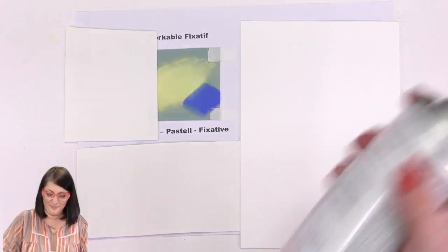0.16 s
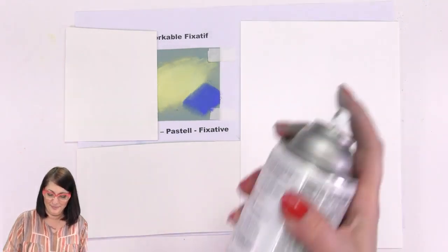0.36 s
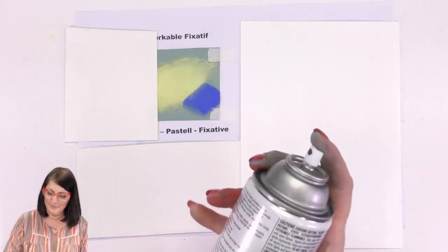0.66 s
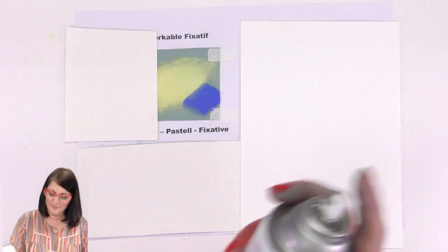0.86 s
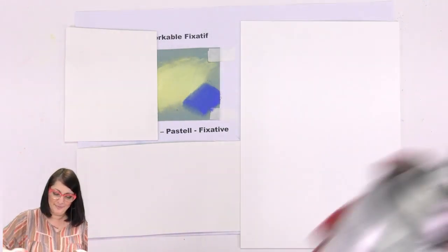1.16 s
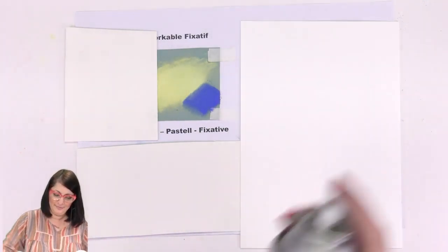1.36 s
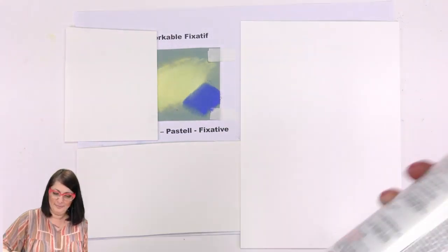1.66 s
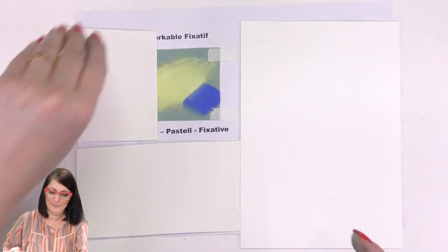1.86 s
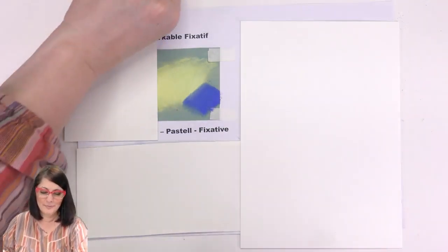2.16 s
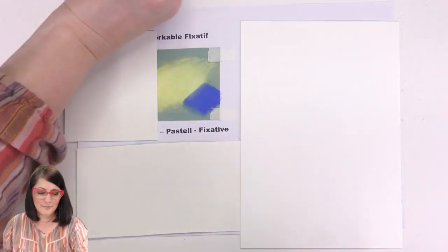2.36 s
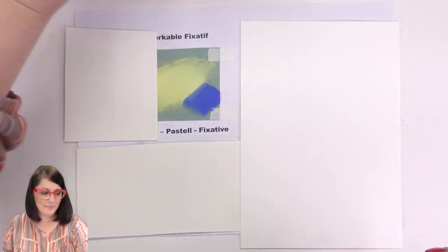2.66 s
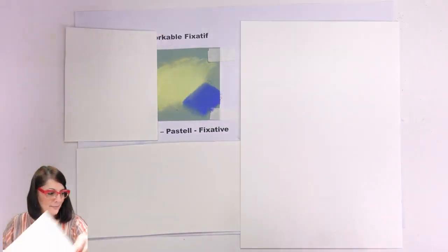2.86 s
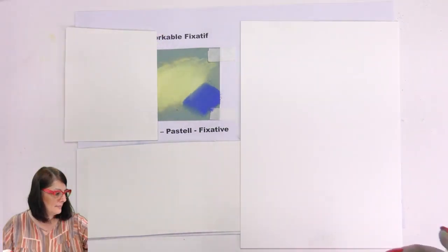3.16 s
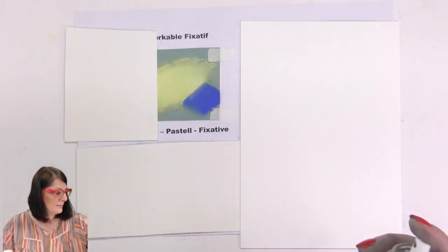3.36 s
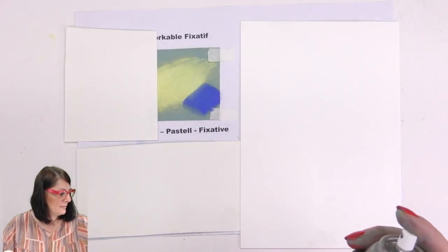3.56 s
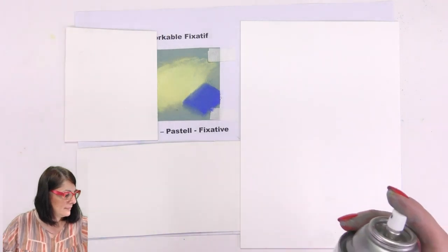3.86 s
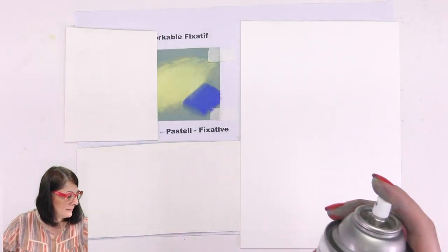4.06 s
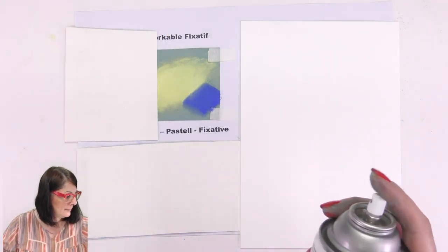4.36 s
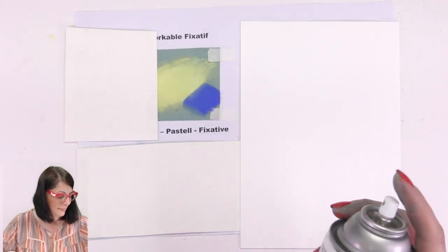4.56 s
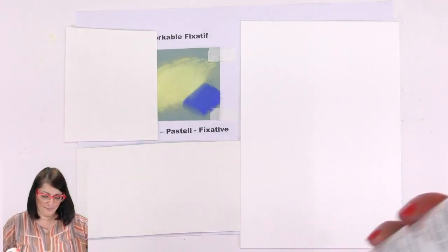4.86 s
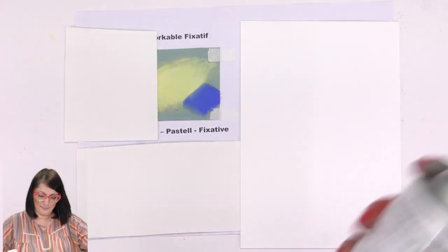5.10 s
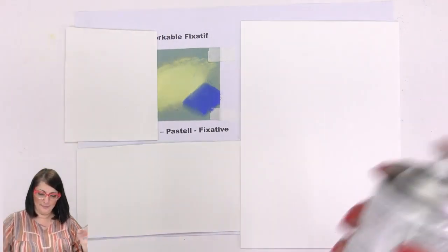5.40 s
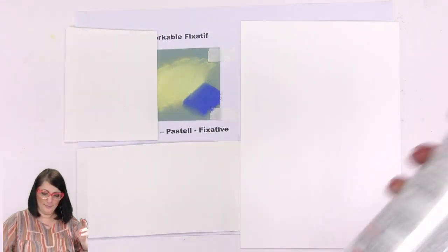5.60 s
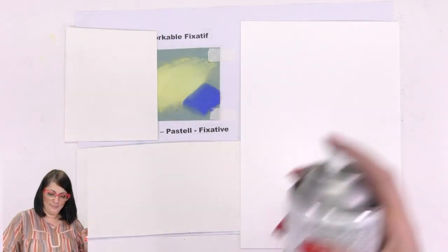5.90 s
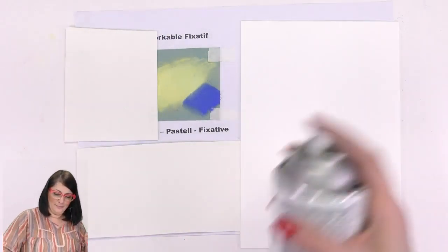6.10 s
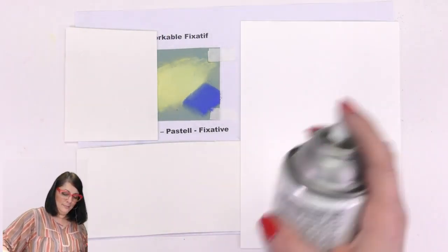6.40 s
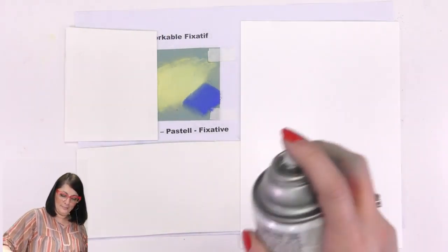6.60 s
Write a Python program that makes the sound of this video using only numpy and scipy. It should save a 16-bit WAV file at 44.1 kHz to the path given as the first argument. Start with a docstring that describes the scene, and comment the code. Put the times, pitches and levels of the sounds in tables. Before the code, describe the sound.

Leftover fizz and light ball knocks die away in an aerosol can, then a brief burst of loud steel clacks with liquid fizz. The ball bounces and rolls to a stop. A quiet pause holds only dry paper rubs, small desk bumps and faint swilling. Rapid rattling returns for over a second. Close microphone, slightly overloaded, leaning right, short indoor room tail.

```python
"""Fizz from an earlier stroke dies away while a few light knocks and a settling ball patter and roll along a can wall.
A burst of shaking follows: the mixing ball clacks on the can ends, glances off the wall, and the liquid fizzes.
The ball settles again, then a hand rubs and bumps about on paper and a desk while the liquid swills faintly.
A second, longer burst ends in a few knocks. Hits are decaying sines with noise; fizz, rubs and air are shaped noise.
A small room's low noise lies under it all, and the close microphone overloads on the hardest hits."""
import sys
import numpy as np
from scipy import signal
from scipy.fft import rfft, irfft
from scipy.io import wavfile
from scipy.ndimage import uniform_filter1d

SR = 44100
rng = np.random.default_rng(int(sys.argv[2]) if len(sys.argv) > 2 else 0)


def digitize_waveform(pressure):
    """Quantize a signal to 16-bit integers and store it at the path in sys.argv[1].

    Rows of a 2-D input are taken as channels; values are limited to [-1, 1].
    """
    field = np.atleast_2d(pressure).T
    bounded = np.clip(field, -1, 1)
    quanta = np.round(bounded * 32767).astype(np.int16)
    wavfile.write(sys.argv[1], SR, quanta)


N = 297234  # length in samples
AGE = np.arange(4096) / SR  # seconds since a hit

# Steady room noise, spectrum: freq_hz, relative_level_db
ROOM_NOISE = [(12, -27.5), (20, -1), (53, -0.5), (150, -11), (270, -1), (328, -10), (527, -19), (949, -22),
              (1030, -21.5), (1290, -23), (6360, -36), (16000, -42)]
ROOM_NOISE_DB = -59
# Decay of the room's tail: freq_hz, t60_s
ROOM_T60 = [(200, 0.1), (800, 0.31), (1600, 0.27), (4000, 0.26), (9000, 0.24), (16000, 0.15)]
# Tone of the room's tail: freq_hz, relative_level_db
ROOM_COLOUR = [(100, -15.5), (500, 4.5), (1500, 2.5), (3500, 0.5), (8000, 4), (16000, 5)]
# Echoes from the desk: delay_s, relative_level_db
DESK_ECHOES = [(.0023, -3), (.0056, -7.5), (.0101, -4), (.0135, -18)]

# Air pushed at the microphone by the moving can: fastest_s, length_s, level_db
DRAUGHTS = [(.12, 0.28, -45.5), (1.15, 1.73, -47.5), (5.5, 2.56, -53)]
# Spectrum of that air: freq_hz, relative_level_db
DRAUGHT_COLOUR = [(4, -11.5), (12, -1.5), (25, -12.0), (50, -29), (200, -55.0), (1000, -100)]
SPEED_UP = .35  # share of any movement spent gathering speed

# Hand and sleeve sliding on paper or can: fastest_s, length_s, rub_db, hiss_db
RUBS = [(0.757, 0.22, -66.5, -67), (2.125, 0.26, -62, -58), (2.217, 0.13, -58.5, -63),
        (2.433, 0.65, -58.5, -51.5), (2.774, 0.22, -67, -68), (3.07, 0.19, -75.5, -68.5),
        (3.796, .14, -59.5, -67.5), (4.212, 0.062, -59, -57.5), (4.29, 0.21, -61.5, -64),
        (4.474, 0.3, -61.5, -59), (4.83, .13, -72, -65.5)]
# Dull part of the rubbing, spectrum: freq_hz, relative_level_db
RUB_COLOUR = [(200, -7), (500, -2.5), (900, -2), (1500, -0.5), (2300, -3.5), (4000, -18), (8000, -20),
              (16000, -42)]
# Fine part of the rubbing, spectrum: freq_hz, relative_level_db
HISS_COLOUR = [(1000, -24), (3000, 2.5), (6000, -0.5), (10000, -5), (13000, -8.5), (16000, -13)]
# Soft bumps of the hand on the desk: start_s, level_db
BUMPS = [(2.787, -54), (3.125, -51.5), (4.3, -53.5), (4.629, -44.5)]
# Spectrum of a bump: freq_hz, relative_level_db
BUMP_COLOUR = [(100, -20), (600, 9.5), (1200, 6.0), (2500, -3.0), (8000, -21)]

# Liquid fizz, also the can's noisy shimmer, spectrum: freq_hz, relative_level_db
FIZZ_COLOUR = [(100, -31), (400, -23), (900, -10), (1400, -5.5), (2200, -3), (3000, -0.5), (3700, -4.5),
               (4600, -7.5), (6500, -3.5), (9500, -10.5), (15500, -18.5)]
# Fizz left over from an earlier stroke: start_s, level_db
FIRST_SLOSH = (0, -29)
# Liquid rocking in the tilted can, each swill fainter and higher than the one before
SWILL_START_S, SWILL_PERIOD_S, SWILL_LENGTH_S = 2.725, .297, .15  # start is the middle of the first swill
SWILL_DB, SWILL_FADE_DB, SWILL_HZ, SWILL_RISE_HZ = -61.5, -2.2, 3670, 150

# The ball settles by bouncing and rolling: start_s, length_s, bounce_db, ring_hz, patter_pace, roll_db
SETTLES = [(0.2359, 0.53, -27.5, 1970, 1.03, -60.5), (1.4446, 0.24, -20.5, 1640, 1.2, -53),
           (1.8598, 0.19, -21, 1560, .95, -57), (2.333, 0.25, -28.5, 1513, 1.7, -51.5)]
# Bounces quicken to a steady patter; the last gap is for a pace of 1
FIRST_GAP_S, LAST_GAP_S, GAP_SHRINK = .0467, .0205, .32
# The ring drifts towards the wall's pitch, keeping this share of the distance at each bounce
WALL_HZ, PITCH_KEPT = 1532, 0.6
BOUNCE_FADE_DB, BOUNCE_TICK_DB = -37, -5  # fade over one settle's length; tick against ring

# Single lighter knocks of the ball, most on the side wall, the higher-ringing ones on a can end:
# start_s, strength_db, ring_hz, tick_db (against ring)
KNOCKS = [(0.0968, -29, 1080, -3), (0.236, -21, 1870, -15), (0.3738, -31, 3800, -7.5),
          (0.4185, -30.5, 2210, -8), (0.4381, -30, 3820, -10), (0.453, -35, 3620, -8),
          (0.9217, -31, 1810, -5), (0.9801, -29, 2250, -15), (1.2186, -23, 3240, 2.5),
          (1.241, -18.5, 1950, -2), (1.2988, -21, 2020, -7), (1.4473, -15.5, 1860, -10),
          (1.477, -22, 1860, -20), (1.7303, -21.5, 1830, -5), (1.8598, -28, 1580, -6),
          (2.3944, -28.5, 3650, -11), (2.462, -31, 3570, -8), (2.492, -34, 3580, -9),
          (2.5196, -35, 3500, -2.5), (4.917, -31.5, 1890, -1.5), (4.9406, -38.5, 4370, 2.5),
          (4.969, -34, 1650, -2), (5.303, -27, 3180, 5), (5.4247, -14.5, 1720, -17),
          (5.513, -22, 1180, -0.5), (5.5758, -22, 2320, 12), (5.8433, -19.5, 1860, -13),
          (5.97, -21.5, 1150, -4), (6.2106, -18, 3700, -24), (6.254, -17.5, 2040, -23),
          (6.4215, -15.5, 1860, -1.5), (6.509, -21.5, 1566, -1.5), (6.6382, -23, 2050, -3.5),
          (6.725, -30.5, 1740, 3)]
# A full stroke throws the ball back at the wall, and a second knock follows
REBOUND_S, REBOUND_DB, REBOUND_HZ, REBOUND_TICK_DB = .0555, -17.5, 1870, -17
SECOND_KNOCK_S, SECOND_KNOCK_DB = 0.036, -5  # average lag after the first; level offset
REBOUND_SCATTER_OCT = 0.49  # standard deviation of the pitch
KNOCK_RING_DB, KNOCK_RING_T60_S = -22, 0.18  # the can sings on faintly after a knock

# Ball on a can end: start_s, strength_db, ring_hz, tick_db (against ring), landing_spot,
# slosh_db (None unless the stroke throws the liquid)
CLACKS = [(0.9916, -2, 4624, -14, "rim", None), (1.019, -9.5, 3700, -2.5, "rim", None),
          (1.075, -4, 3660, -4, "dome", -27.5), (1.154, -.5, 3150, -6.5, "rim", None),
          (1.1638, 3, 3660, -42, "dome", -26), (1.3021, -3.5, 3720, -2, "dome", -29),
          (1.396, 3.5, 3466, -9, "rim", -19.5), (1.8256, -11, 3900, -15, "dome", None),
          (2.33, -20, 3790, -7, "dome", None), (4.993, -11.5, 4340, 2, "dome", None),
          (5.1055, -0.5, 3134, -7.5, "rim", -24.5), (5.2041, -5, 3920, -1.5, "dome", -32),
          (5.3065, 2.5, 3523, -11.5, "rim", -25), (5.435, -6.5, 3630, 0, "dome", None),
          (5.551, 0.5, 3570, -11, "rim", None), (5.555, 0, 3460, -17, "rim", -26.5),
          (5.6574, -3.5, 3710, -0.5, "dome", None), (5.742, 2.5, 3580, -3.5, "dome", -25.5),
          (5.8729, -3.5, 3740, -5.5, "dome", -29), (5.9738, 2, 3650, -11.5, "dome", -31),
          (6.091, -7, 3800, 4.5, "dome", -31.5), (6.1828, 3, 3764, -10, "dome", -22.5),
          (6.3081, -11, 3780, 2.5, "dome", None), (6.6992, -22.5, 3860, 8.5, "rim", None)]
# Low thud by landing spot, strong on the springy dome, faint on the stiff rim: level_db (against hit)
THUD_DB = {"dome": -22.5, "rim": -41}
# Nominal modes of the thin steel shell: pitch_hz, relative_level_db, t60_s
SHELL = [(995, -7.5, 0.0031), (1154, -0.5, 0.011), (1530, -1, 0.013), (1837, -10, 0.022), (2260, -6, 0.016),
         (2630, 0.5, 0.008), (3150, -4, 0.02), (3385, -3, .013), (3805, -6, 0.037), (4167, 1.5, 0.015),
         (4626, 5, 0.0087), (5010, -2.5, 0.0043), (5340, 0, 0.017), (6124, -1, 0.011)]
# Steel-on-steel tick, spectrum: freq_hz, relative_level_db
TICK_COLOUR = [(600, -9.5), (2000, 2.5), (3000, -0.5), (5200, 5), (7000, -8.5), (8000, -0.5), (10000, 1.5),
               (12500, -8), (15500, -1.5)]

BALANCE_DB = -7.5  # left against right
EDGE_HZ = 16000  # top of the microphone's band


def amp(db):
    """Decibels to gain."""
    return 10 ** (np.asarray(db) / 20)


def unit(x):
    """Scales to an rms of 1."""
    return x / np.sqrt(np.mean(x ** 2) + 1e-20)


def blow(x):
    """Scales a hit to the energy of 2 ms at rms 1."""
    return x / np.sqrt(np.sum(x ** 2) / (.002 * SR) + 1e-20)


def fade(t, t60_s):
    """Exponential decay that falls 60 dB in t60_s."""
    return amp(-60 * t / t60_s)


def sine(hz, t):
    """Steady sine tone."""
    return np.sin(2 * np.pi * hz * t)


def read(points, hz):
    """Reads a spectrum on a log-frequency axis."""
    f, value = np.transpose(points)
    return np.interp(np.log(hz + 1), np.log(f + 1), value)


def vary(colour):
    """The same spectrum with random bumps and dips: no two blows land on the same spot."""
    hz = np.geomspace(100, 16000, 30)
    return np.column_stack([hz, read(colour, hz) + 2.5 * rng.standard_normal(len(hz))])


def add(mix, s, sound):
    """Mixes a sound in at time s."""
    part = mix[max(round(s * SR), 0):][:len(sound)]
    part += sound[:len(part)]


def tint(x, colour):
    """Filters a sound by the given spectrum and scales it to rms 1."""
    hz = np.fft.rfftfreq(len(x), 1 / SR)
    return unit(irfft(rfft(x) * amp(read(colour, hz)), len(x)))


def noise(colour, size):
    """Noise of rms 1 with the given spectrum."""
    return tint(rng.standard_normal(size), colour)


def grainy(colour, per_s, spread_db):
    """A random shower of tiny clicks of uneven size, with the given spectrum and rms 1."""
    sizes = rng.standard_normal(N) * amp(spread_db * np.minimum(rng.exponential(1, N), 4))
    return tint(sizes * (rng.random(N) < per_s / SR), colour)


def band(x, hz, width_hz):
    """One broad resonance; the result has rms 1."""
    return unit(signal.lfilter(*signal.iirpeak(hz, hz / width_hz, SR), x))


def swell(moves):
    """Gain over time from movements that each speed up to a peak and slow down again."""
    gain, t = np.zeros(N), np.arange(N) / SR
    for peak_s, length_s, db in moves:
        phase = np.interp((t - peak_s) / length_s, [-SPEED_UP, 0, 1 - SPEED_UP], [0, np.pi / 2, np.pi])
        gain += amp(db) * np.sin(phase) ** 2
    return gain


def air():
    """Slow buffeting from the moving can and the steady noise of the room."""
    draught = swell(DRAUGHTS) * noise(DRAUGHT_COLOUR, N)
    return draught + amp(ROOM_NOISE_DB) * noise(ROOM_NOISE, N)


def room(x, early_db, tail_db):
    """Quick echoes from the desk, then a short diffuse tail whose bands die at their own speeds."""
    t = np.arange(SR // 2) / SR
    taps = rng.standard_normal(len(t)) * (rng.random(len(t)) < 6000 / SR) * (t > .004)
    hz, when, bands = signal.stft(taps, SR, nperseg=256)
    bands = bands * amp(read(ROOM_COLOUR, hz)[:, None] - 60 * when / read(ROOM_T60, hz)[:, None])
    response = signal.istft(bands, SR, nperseg=256)[1]
    response *= amp(tail_db) / np.linalg.norm(response)
    for delay_s, db in DESK_ECHOES:
        add(response, delay_s, amp([early_db + db]))
    return x + signal.fftconvolve(x, response)[:N]


def hand():
    """Skin and cloth on paper: a dull rub and a fine hiss that flutter with the grip, and a few bumps."""
    flutter_db = 1.5 * unit(uniform_filter1d(rng.standard_normal(N), size=500))
    rub = swell([(s, length, db) for s, length, db, _ in RUBS]) * noise(RUB_COLOUR, N)
    hiss = swell([(s, length, db) for s, length, _, db in RUBS]) * noise(HISS_COLOUR, N)
    out = amp(flutter_db) * (rub + hiss)
    for s, db in BUMPS:
        envelope = fade(AGE, 0.14) * (1 - np.exp(-AGE / 0.00061))
        add(out, s, amp(db) * envelope * noise(BUMP_COLOUR, len(AGE)))
    return out


def swills(count):
    """The liquid rocks to and fro in the tilted can; each pass pops a few small bubbles."""
    out, size = np.zeros(N), int(SWILL_LENGTH_S * SR)
    pops = grainy(FIZZ_COLOUR, per_s=200, spread_db=2.0)
    for k in range(count):
        s, hz = SWILL_START_S + k * SWILL_PERIOD_S, SWILL_HZ + k * SWILL_RISE_HZ
        bubbles = pops[int(s * SR):][:size]
        bubbles = band(band(bubbles, hz, width_hz=850), hz, width_hz=850)
        level = amp(SWILL_DB + k * SWILL_FADE_DB)
        add(out, s - SWILL_LENGTH_S / 2, level * np.hanning(size) * bubbles)
    return out


def full_strokes():
    """Picks the strokes that throw the liquid along with the ball: start_s, strength_db, slosh_db."""
    return [(s, db, slosh_db) for s, db, *_, slosh_db in CLACKS if slosh_db is not None]


def liquid():
    """Each full stroke churns up fizz and small splashes that die away."""
    out, t = np.zeros(N), np.arange(16384) / SR
    splashes = grainy(FIZZ_COLOUR, per_s=500, spread_db=1.5)
    envelope = fade(t, 0.32) * (1 - np.exp(-t / 0.0033))
    for s, db in [FIRST_SLOSH] + [(s, slosh_db) for s, _, slosh_db in full_strokes()]:
        splash = np.roll(splashes, -int(s * SR))[:len(t)]
        churn = noise(vary(FIZZ_COLOUR), len(t)) + amp(-15.5) * splash
        add(out, s, amp(db) * envelope * churn)
    return out


def rolling():
    """The settling ball chatters along the wall, which hums at its own pitch and sets the can ends ringing."""
    chatter = grainy(FIZZ_COLOUR, per_s=3200, spread_db=5.5)
    wall = amp(1.5) * band(chatter, hz=WALL_HZ, width_hz=250)
    ends = amp(-5) * band(chatter, hz=3520, width_hz=810)
    speed = swell([(s + SPEED_UP * length, length, roll_db) for s, length, *_, roll_db in SETTLES])
    return speed * (chatter + wall + ends)


def strike(ring_hz, tick_db, ring_t60, shell_db, focus_db, tick_t60, ping_db, shimmer_db):
    """The struck spot rings for a few cycles, damped by the liquid; shell modes near its pitch join in."""
    hz, db, t60 = np.transpose(SHELL)[:, :, None]
    luck, detune, side = rng.standard_normal((3, len(SHELL), 1))
    # modes lose focus_db for every octave away from the ring
    weight_db = db + 2 * luck - focus_db * abs(np.log2(hz / ring_hz))
    pitch = hz * (1 + .015 * detune)
    shell = np.sign(side) * amp(weight_db) * fade(AGE, t60) * sine(pitch, AGE)
    ring = fade(AGE, ring_t60) * sine(ring_hz, AGE)
    body = blow(blow(ring) + amp(shell_db) * blow(shell.sum(0)))
    # steel on steel: a sharp tick, and a high ping at a random pitch
    tick = noise(vary(TICK_COLOUR), len(AGE)) * fade(AGE, tick_t60)
    ping = sine(rng.uniform(5000, 10000), AGE) * fade(AGE, 0.00037)
    contact = blow(tick) + amp(ping_db) * blow(ping)
    # countless weak modes of the rest of the can hang on as a noisy shimmer
    shimmer = noise(vary(FIZZ_COLOUR), len(AGE)) * amp(shimmer_db) * fade(AGE, 0.05)
    shimmer *= np.linspace(1, 0, len(AGE))
    hit = body + amp(tick_db) * contact + shimmer
    # so small a shell radiates little bass
    return signal.lfilter(*signal.butter(2, 780, "high", fs=SR), hit)


def bounces(count):
    """A settling ball bounces ever quicker and softer, its ring drifting to the wall's pitch."""
    rows, k = [], np.arange(count)
    for s, length, db, hz, pace, _ in SETTLES:
        patter_s = LAST_GAP_S / pace
        ages = np.cumsum(patter_s + (FIRST_GAP_S - patter_s) * GAP_SHRINK ** k)
        pitches = WALL_HZ + (hz - WALL_HZ) * PITCH_KEPT ** (k + 1)
        for age, pitch in zip(ages, pitches):
            rows.append((s + age, db + BOUNCE_FADE_DB * age / length, pitch, BOUNCE_TICK_DB))
    return rows


def rebounds():
    """After each full stroke the ball crosses the can and glances off the wall twice, at scattered pitches."""
    rows, strokes = [], full_strokes()
    for (s, db, _), luck in zip(strokes, rng.standard_normal((len(strokes), 3))):
        first_hz, second_hz = REBOUND_HZ * 2 ** (REBOUND_SCATTER_OCT * luck[:2])
        first_s = s + REBOUND_S
        second_s = first_s + SECOND_KNOCK_S * (1 + 0.092 * luck[2])
        # only the second knock follows the strength of the stroke
        second_db = REBOUND_DB + SECOND_KNOCK_DB + db
        rows.append((first_s, REBOUND_DB, first_hz, REBOUND_TICK_DB))
        rows.append((second_s, second_db, second_hz, REBOUND_TICK_DB))
    return rows


def knocks():
    """Lighter hits, most on the side wall, some on a can end; above 2 kHz, higher rings die sooner."""
    out = np.zeros(N)
    for s, db, ring_hz, tick_db in KNOCKS + bounces(count=13) + rebounds():
        ring_t60 = min(.012 * (2000 / ring_hz) ** 2, .012)
        hit = strike(ring_hz, tick_db, ring_t60, shell_db=-1.0, focus_db=11,
                     tick_t60=0.0092, ping_db=-7, shimmer_db=-22.0)
        sing = band(band(rng.standard_normal(len(AGE)), ring_hz, width_hz=440), ring_hz, width_hz=440)
        sing *= amp(KNOCK_RING_DB) * fade(AGE, KNOCK_RING_T60_S)
        add(out, s, amp(db) * (hit + sing))
    return out


def clacks():
    """Hits on the can's ends ring the shell and also jolt the whole can: a low thud."""
    out = np.zeros(N)
    thud = blow((sine(465, AGE) + amp(-12) * sine(150, AGE)) * fade(AGE, .02))
    for s, db, ring_hz, tick_db, spot, _ in CLACKS:
        hit = strike(ring_hz, tick_db, ring_t60=0.008, shell_db=-2.0, focus_db=8.0,
                     tick_t60=0.014, ping_db=-8.5, shimmer_db=-15.5)
        add(out, s, amp(db) * (hit + amp(THUD_DB[spot]) * thud))
    return out


def scene():
    """One microphone hears everything and is panned to the right; each channel has a little noise of its own."""
    sources = hand() + swills(count=4) + liquid() + rolling() + knocks() + clacks()
    sound = air() + room(sources, early_db=-20.5, tail_db=-11)
    own_noise = np.array([noise(ROOM_NOISE, N), noise(ROOM_NOISE, N)])
    return sound * amp([[BALANCE_DB], [0]]) + amp(-74.0) * own_noise


def record(dry, ceiling=0.58, lopsided=0.079):
    """Each channel clips on the hardest hits, its upper side a little sooner; then the band limit."""
    limit = ceiling * (1 - lopsided * np.sign(dry))
    clipped = dry / (1 + (dry / limit) ** 8) ** (1 / 8)
    lowpass = signal.firwin(255, EDGE_HZ, window=("kaiser", 9), fs=SR)
    return signal.oaconvolve(clipped, lowpass[None], "same")


dry = scene()
out = record(dry)
digitize_waveform(out)
```